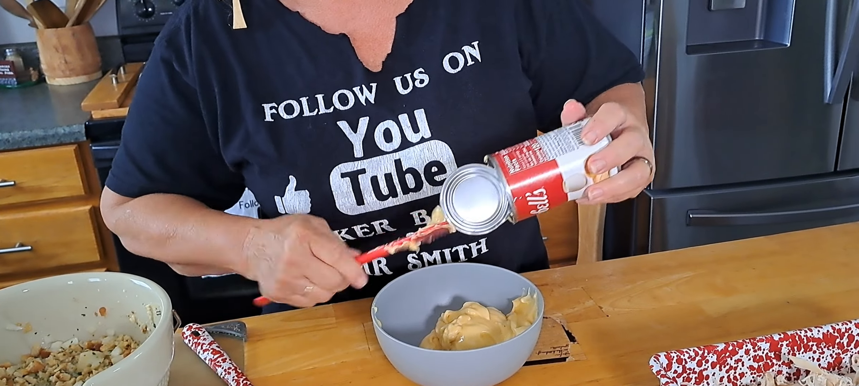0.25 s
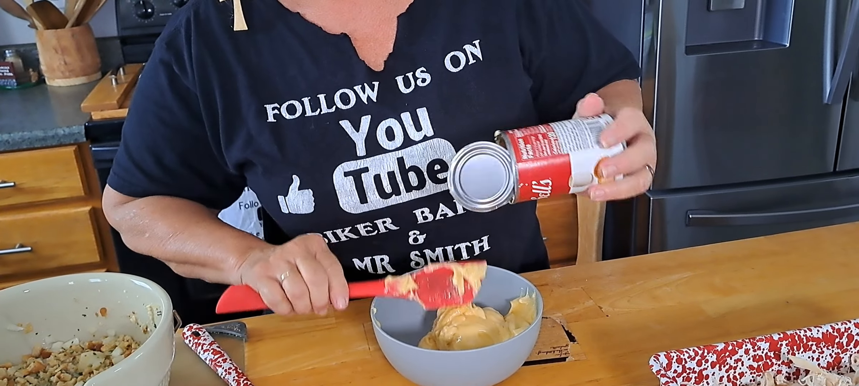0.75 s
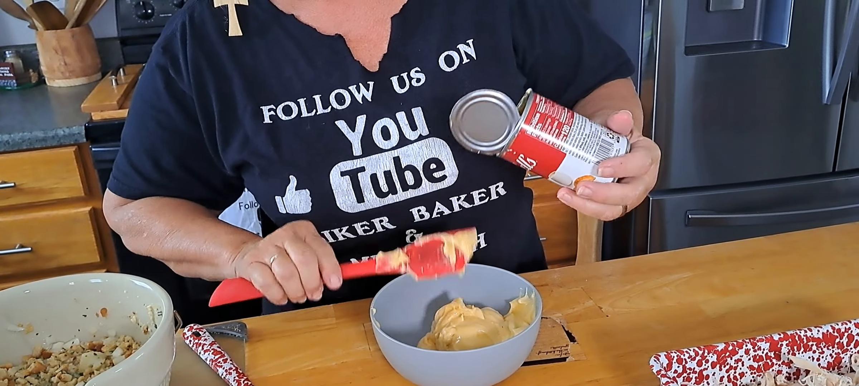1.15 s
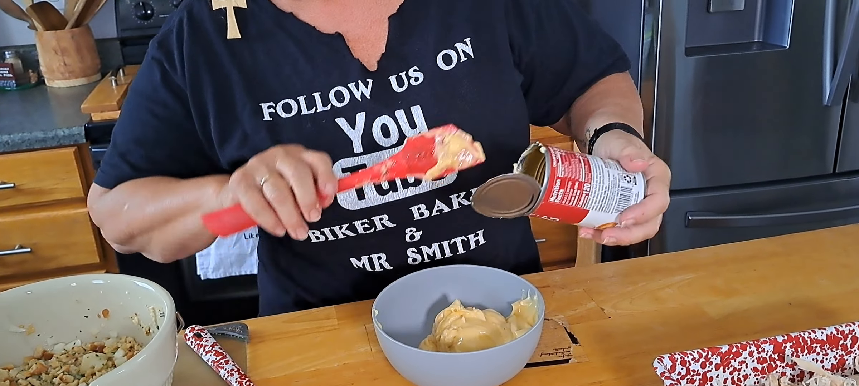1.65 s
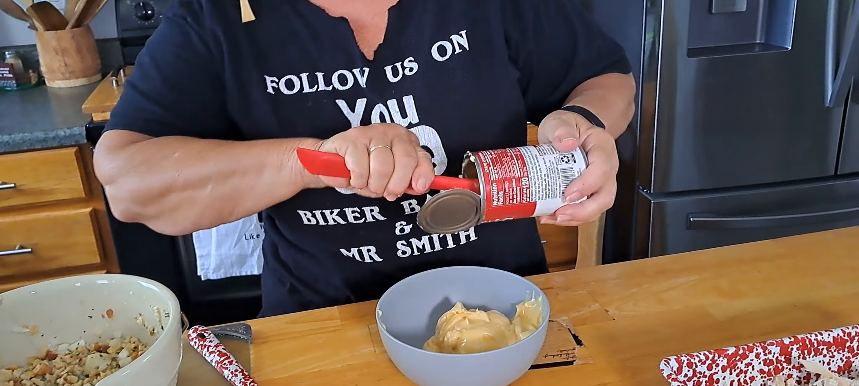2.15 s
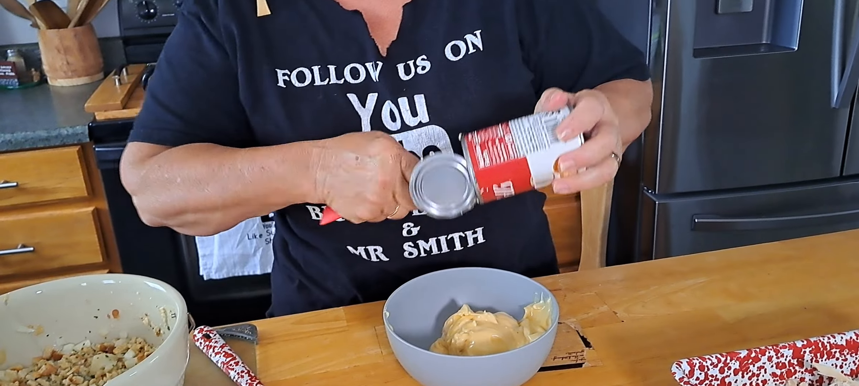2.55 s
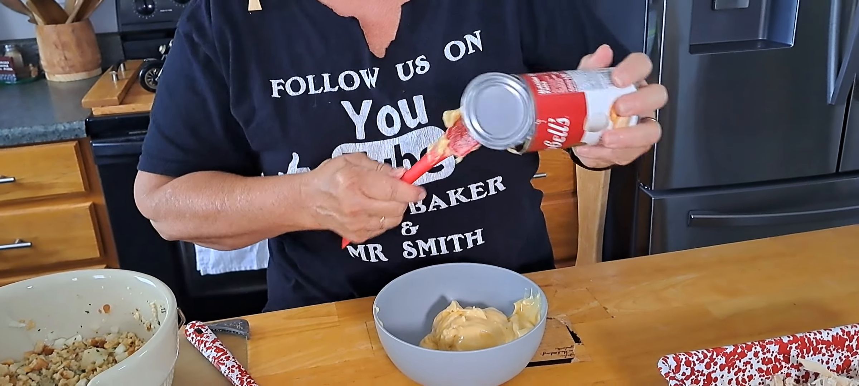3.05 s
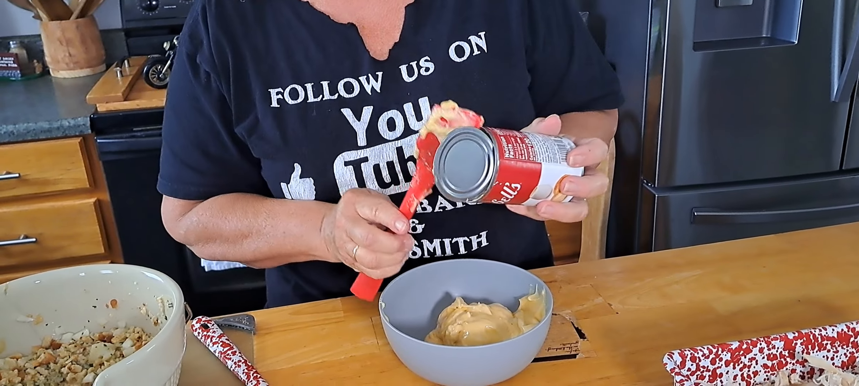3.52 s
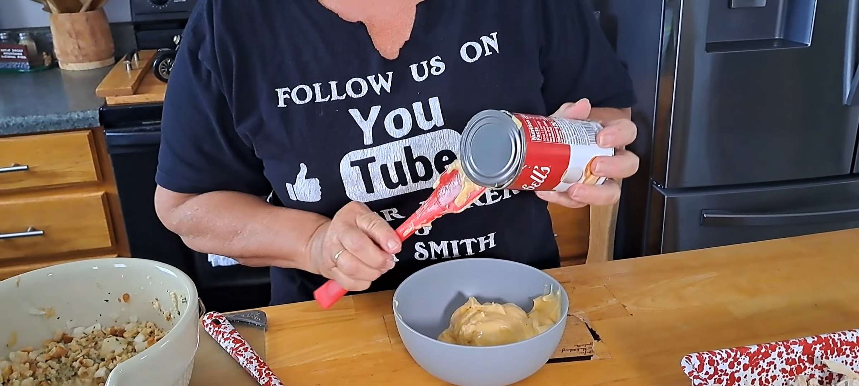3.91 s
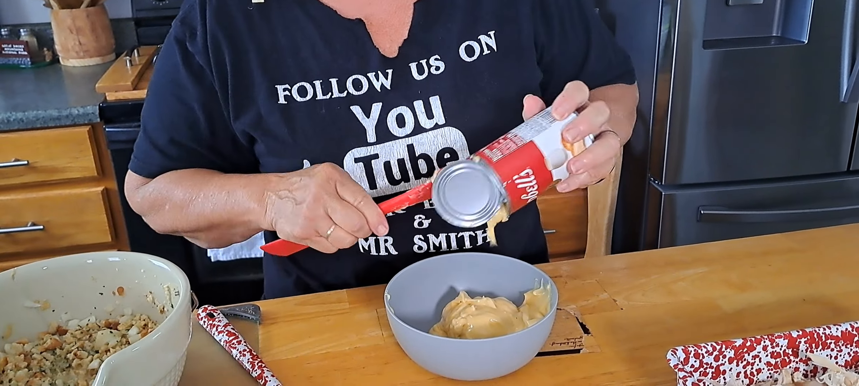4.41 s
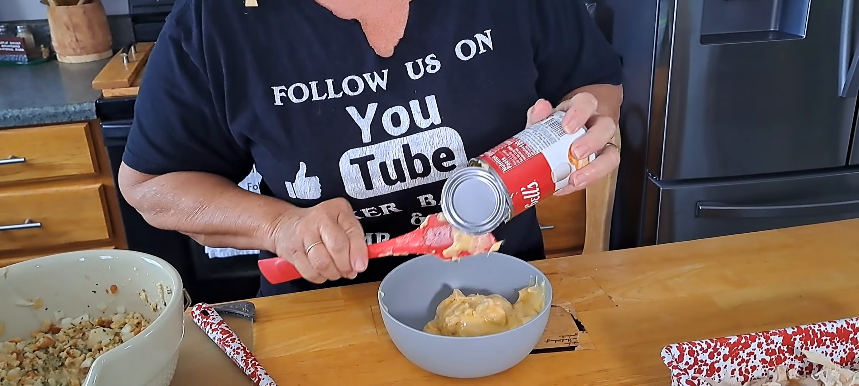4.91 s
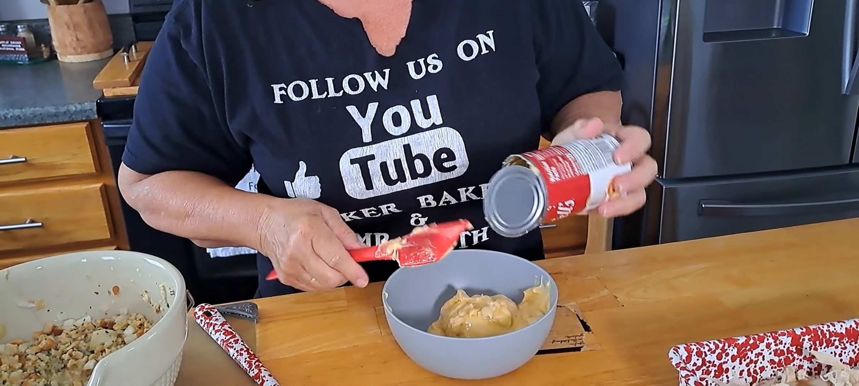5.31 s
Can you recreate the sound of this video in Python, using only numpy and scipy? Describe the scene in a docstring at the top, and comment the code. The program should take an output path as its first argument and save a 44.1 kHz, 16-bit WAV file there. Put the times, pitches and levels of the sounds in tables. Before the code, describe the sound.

In a quiet kitchen, a spatula raps a bowl four times with woody thuds, then a can is scraped with soft thumps and brief squeaks.

```python
"""A spatula is knocked four times on a bowl rim: each knock is a noise crack plus short ringing modes.
The bowl rocks on a wooden counter; every landing excites the counter's low modes.
The spatula goes back into a tin can of thick soup: noise slips through the can's resonances scrape,
unsteady sines squeal, shaped noise rubs. Close on the left, dull modal bumps rebound.
A quiet kitchen adds noise-tail reverberation, low rumble and hum that rise and fall, and faint hiss."""
import sys
import numpy as np
from scipy import signal
from scipy.fft import rfft, irfft
from scipy.io import wavfile
from scipy.ndimage import uniform_filter1d

SR = 44100
rng = np.random.default_rng(int(sys.argv[2]) if len(sys.argv) > 2 else 0)


def int16_out(signal):
    """Quantize to a 16-bit WAV file."""
    q = np.round(np.clip(np.atleast_2d(signal).T, -1, 1) * 32767)
    wavfile.write(sys.argv[1], SR, q.astype(np.int16))


N = 245548

# spatula on bowl rim [t/s, level/dB, treble tilt/(dB/octave), room/dB, delay to bowl landing/s, landing/dB]
KNOCKS = [(0.5346, -2.5, -0.5, 7, .0622, 2.5), (0.7693, 1, -2, 1, 0.038, -0.5), (1.0151, 1, -1, 2, .05, -2),
          (1.3124, -7, -1.5, 3.5, 0.032, -8)]
# knock crack spectrum [f/Hz, level/dB]
CRACK = [(80, -9.5), (170, 0.5), (450, -28.5), (850, -4.5), (1080, 0.5), (1280, -3.5), (1900, -4),
         (2500, -13), (3750, 1.5), (4250, -5.5), (5500, -7.5), (7700, -17.5), (9000, -30), (15000, -44)]
# bowl modes [f/Hz, level/dB, t60/s]
BOWL_MODES = [(290, -4.5, 0.077), (564, -16, 0.08), (767, -17, 0.21), (1017, 0, 0.031), (1060, -1, 0.027),
              (1330.4, -2, .045), (1560, -0.5, .05), (1755, -13, 0.078), (2059, -14, .035),
              (3570, -4, 0.017), (5536, -4.5, 0.027)]
# wooden counter modes [f/Hz, level/dB, t60/s]
COUNTER_MODES = [(47.62, -27, 0.7), (72.5, -28.5, 0.46), (103.8, -19, 0.28), (168.1, -8, 0.25),
                 (201.6, -9, .2), (222.9, 3.5, 0.053), (302.4, -14, 0.22), (423, -9.5, .07),
                 (614, -12.5, .06)]
# the bowl lands, then rocks to rest in even, weakening steps; push is relative to the knock
PUSH_DB, ROCK_S, ROCK_LOSS_DB = -3, .0305, 11

# blade friction spectrum on tin [f/Hz, level/dB]
FRICTION = [(150, -26.5), (500, -13), (900, -7), (1600, -8.5), (2500, -5.5), (4000, -5), (5200, -7.5),
            (8000, -14), (9500, -29), (15000, -31.5)]
# can resonances [f/Hz, width/Hz, level/dB]
CAN_RESONANCES = [(667.6, 250, 9.1), (970, 62, 1.2), (2341, 250, 7), (3330, 51, 5.3), (3840, 87, 6.1)]
# blade catching rim or lid [t/s, level/dB, treble tilt/(dB/octave)]
TICKS = [(0.636, -25.5, 3), (2.023, -46, -7), (2.141, -60.5, 8), (2.444, -49, 24), (2.557, -37.5, -1),
         (2.817, -48, -7.5), (3.043, -48.5, 3), (3.6565, -20.5, 0), (3.77, -39.5, 8), (3.783, -38.5, 5),
         (3.829, -42.5, 5), (3.932, -50, 9.5), (4.172, -28.5, 3), (4.31, -54.5, 2.5), (4.487, -59, -5.5)]
TICK_RISE_S, TICK_FALL_S = 0.00058, 0.0029
# blade dragging over tin
# [peak t/s, rise/s, fall/s, rasp level/dB, low note f/Hz, level/dB, high note f/Hz, level/dB]
DRAGS = [(1.951, 0.0069, 0.033, -59, 1039, -55.5, 2300, -58.5),
         (2.923, 0.037, 0.0099, -28, 784, -43, 2507, -36.5),
         (3.675, .009, 0.037, -36, 675.7, -28.5, 2340, -42)]
NOTE_UNSTEADY = 0.055  # rms pitch wobble, share of pitch
# thin whistles while the can is wiped [peak t/s, level/dB, f/Hz]
WHISTLES = [(2.33, -80, 4800), (3.06, -69.5, 2734), (3.35, -78.5, 2780)]
WHISTLE_RISE_S, WHISTLE_FALL_S, WHISTLE_UNSTEADY = 0.065, 0.21, 0.029
# level of the blade sweeping through soup [t/s, level/dB]
SWEEP = [(0, -79.5), (1.8, -84.5), (2.0, -64), (2.45, -62), (3.1, -63), (3.35, -57.5), (3.6, -64.5),
         (4.55, -67), (4.7, -75)]
# hollow spectrum of that sweep [f/Hz, level/dB]
HOLLOW = [(150, -22), (300, -5.5), (450, 0.5), (640, 2.5), (800, -12), (1100, -25.5), (2000, -26),
          (5000, -26.5), (15000, -50.5)]

# dull bumps on the left [t/s, level/dB, treble tilt/(dB/octave)]
BUMPS = [(2.815, -20.5, 10.5), (2.9093, 2, 10.5), (2.968, -11.5, 5), (3.0435, -1.5, 8), (3.358, -25.5, 5.5),
         (3.728, -8, 13.5), (3.753, -5.5, 9), (3.829, -12.5, 13), (3.925, -22.5, 7), (3.955, -22.5, 0),
         (3.999, -21.5, -2.5), (4.035, -21.5, -1.5), (4.117, -26, 1), (4.1712, 1.5, 7), (4.291, -16.5, 6),
         (4.3098, -7.5, 6), (4.416, -16.5, 0), (5.457, -23, -2.5)]
# nominal bump modes, before pitch scatter and damping [f/Hz, level/dB, t60/s]
BUMP_MODES = [(209, -6, 0.08), (299.5, 9.5, 0.024), (418, 7, 0.017), (628, -7.5, 0.025), (1052, -4, 0.01),
              (1295, -15.5, 0.026), (1540, -21, 0.015)]
# low boom after the firmest bump [f/Hz, level/dB, t60/s]
BOOM = [(204, -18, 0.21)]
# each rebound is weaker and duller; firmer bumps die sooner
REBOUND_S, REBOUND_LOSS_DB, REBOUND_DULLING_DB_PER_OCTAVE, DAMPING_PER_DB = 0.016, 10.5, 2, .012

# room decay [f/Hz, t60/s]
ROOM_T60 = [(100, 0.26), (400, .38), (3200, 0.33), (5500, 0.41), (8000, .33), (14000, 0.24)]
# room spectrum [f/Hz, level/dB]
ROOM_COLOUR = [(100, -13), (250, -4), (550, 8), (1100, -2), (2500, 0), (5500, -10), (8000, -4.5),
               (14000, 3)]
# room left-right likeness [f/Hz, likeness]
ROOM_SAME = [(100, 0.919), (300, 0.79), (600, 0.41), (1200, .1), (3000, 0.048)]

# rumble, hum and hiss spectrum [f/Hz, level/dB]
BACKGROUND = [(15, -41.5), (25, -10.5), (59, 1.5), (86, -5.5), (178, -5), (204, -10.5), (233, -3.5),
              (349, -18.5), (421, -5.5), (457, -19.5), (648, -19), (762, -34), (3530, -43.5), (7300, -37),
              (15500, -49)]
BACKGROUND_DB = -60  # rms before LOW_LEVEL
# background left-right likeness [f/Hz, likeness]
BACKGROUND_SAME = [(100, 0.89), (300, .8), (700, .6), (2000, 0.016), (12000, 0.01)]
# low rumble and hum, rising and falling; near 5.25 s a soft handling rumble, spatula on bowl or hand
# [t/s, level/dB]
LOW_LEVEL = [(0, -2.5), (1.7, -2.5), (2.5, -2.5), (4.5, 0.5), (5.0, -3), (5.25, 0.5), (5.57, -1)]

EDGE_HZ = 15900  # upper band limit


def knocks(crack_db=6, ring_db=-21, chatter_db=-16, chatter_s=0.004, room_db=-3, left_db=-2.0):
    """A blow is a sharp push, milliseconds of decaying chatter, and a short bowl ring damped by the soup."""
    out = np.zeros((2, N))
    t = np.arange(SR // 2) / SR
    contact = gain_of(chatter_db) * pair(ROOM_SAME, len(t)) * np.exp(-t / chatter_s)
    contact[:, 0] -= 1  # push common to both channels
    for s, db, tilt_db, wet_db, *_ in KNOCKS:
        crack = gain_of(crack_db) * convolve(contact, colour(CRACK, tilt_db))
        blow = crack + gain_of(ring_db) * ring(BOWL_MODES, tilt_db)
        add(out, s, gain_of(db) * (blow + gain_of(room_db + wet_db) * kitchen(blow)))
    return out * gain_of([[left_db], [0]])


def thuds(thud_db=-14, soft_s=0.0013, room_db=-7, count=3):
    """The bowl's foot softly excites counter modes at the blow, then at each landing as it rocks."""
    out = np.zeros(N)
    t = np.arange(SR // 2) / SR
    boom = ring(COUNTER_MODES) * (1 - np.exp(-t / soft_s))
    for s, db, _, _, tipped_s, landing_db in KNOCKS:
        add(out, s, gain_of(db + PUSH_DB) * boom)
        for k in range(count):
            add(out, s + tipped_s + k * ROCK_S, gain_of(landing_db - k * ROCK_LOSS_DB) * boom)
    return gain_of(thud_db) * (out + gain_of(room_db) * kitchen(out))


def can(direct_db=-4, room_db=-3, squeal_room_db=-8, left_db=-2):
    """Scrapes and squeals, direct and reverberant, over the hollow rub of the blade in soup."""
    rasp, notes = scrapes(), squeals()
    reflected = kitchen(gain_of(room_db) * rasp + gain_of(squeal_room_db) * notes)
    heard = gain_of(direct_db) * rasp + notes + reflected
    rub = level(SWEEP) * evened(convolve(pair(BACKGROUND_SAME, N), colour(HOLLOW)))
    return heard * gain_of([[left_db], [0]]) + rub


def scrapes(grain_db=3, drag_tilt_db=0.0):
    """Dense uneven slips of the blade, swelling and dying, excite the tin's resonances."""
    out = np.zeros(N)
    t = np.arange(-SR // 8, SR // 4) / SR
    strokes = [(s, TICK_RISE_S, TICK_FALL_S, db, tilt_db) for s, db, tilt_db in TICKS]
    strokes += [(s, rise, fall, db, drag_tilt_db) for s, rise, fall, db, *_ in DRAGS]
    for s, rise, fall, db, tilt_db in strokes:
        grain = gain_of(grain_db * np.minimum(rng.exponential(1, len(t)), 4))
        slips = evened(rng.standard_normal(len(t)) * grain)
        rasp = convolve(slips * stroke(t, rise, fall), colour(FRICTION, tilt_db, CAN_RESONANCES))[0]
        add(out, s + t[0], gain_of(db) * rasp)
    return out


def squeals(lead=.55, swell=1.01):
    """Uneven grip shakes the pitch of short sines; drag notes peak ahead of the rasp by a share of its rise."""
    out = np.zeros(N)
    t = np.arange(-SR // 4, SR * 3 // 4) / SR
    notes = [(s, db, WHISTLE_RISE_S, WHISTLE_FALL_S, hz, WHISTLE_UNSTEADY) for s, db, hz in WHISTLES]
    for s, rise, fall, _, low_hz, low_db, high_hz, high_db in DRAGS:
        for hz, db in [(low_hz, low_db), (high_hz, high_db)]:
            notes.append((s - lead * rise, db, swell * rise, fall, hz, NOTE_UNSTEADY))
    for s, db, rise, fall, hz, unsteady in notes:
        shake = evened(uniform_filter1d(rng.standard_normal(len(t)), size=50))
        cycles = np.cumsum(hz * (1 + unsteady * shake)) / SR
        add(out, s + t[0], gain_of(db) * stroke(t, rise, fall) * np.sin(2 * np.pi * cycles))
    return out


def stroke(t, rise, fall):
    """Pressure builds smoothly up to t = 0, then dies exponentially."""
    return np.exp(np.where(t < 0, -(t / rise) ** 2, -t / fall))


def bumps(bump_db=-11, low_hz=150, dull_hz=1600, echo_s=0.00491, echo_db=-9, right_db=-16, count=3):
    """Soft contacts rebound, each with one early echo; the right gets a faint smeared copy."""
    out = np.zeros(N)
    for s, db, tilt_db in BUMPS:
        for k in range(count):
            at = s + k * REBOUND_S
            contact = bump(db - k * REBOUND_LOSS_DB, tilt_db - k * REBOUND_DULLING_DB_PER_OCTAVE)
            sound = gain_of(bump_db) * contact
            add(out, at, sound)
            add(out, at + echo_s * rng.uniform(.8, 1.2), gain_of(echo_db) * sound)
    firmest = max(BUMPS, key=lambda row: row[1])
    add(out, firmest[0] + echo_s, ring(BOOM))
    out = signal.sosfilt(signal.butter(8, dull_hz, fs=SR, output="sos"), out)
    out = signal.sosfilt(signal.butter(2, low_hz, "high", fs=SR, output="sos"), out)
    smear = rng.standard_normal(SR // 50) * np.exp(-np.linspace(0, 4, SR // 50))
    right = gain_of(right_db) * convolve(out, smear / np.linalg.norm(smear))[0]
    return np.array([out, right])


def bump(db, tilt_db, soft_s=0.00078, scatter=0.085):
    """One soft contact excites damped modes, their pitches scattered each time."""
    t = np.arange(SR // 2) / SR
    modes = [(hz * (1 + scatter * rng.uniform(-1, 1)), mode_db, t60) for hz, mode_db, t60 in BUMP_MODES]
    contact_s = soft_s * gain_of(-db / 2)  # lighter touch presses in more slowly
    ringing = ring(modes, tilt_db, np.exp(-DAMPING_PER_DB * db))
    return gain_of(db) * ringing * (1 - np.exp(-t / contact_s))


def kitchen(x, gap_s=0.002, build_s=0.0067):
    """Reflections thicken over the first milliseconds, then each band dies at its own speed."""
    hz, t, z = signal.stft(pair(ROOM_SAME, SR * 3 // 4), SR, nperseg=256)
    decay = np.exp(-np.log(1000) * t / read(ROOM_T60, hz)[:, None])
    tail = signal.istft(z * gain_of(read(ROOM_COLOUR, hz))[:, None] * decay, SR)[1]
    since_gap_s = np.maximum(np.arange(tail.shape[1]) / SR - gap_s, 0)
    tail = tail * (1 - np.exp(-since_gap_s / build_s))
    return convolve(x, tail / np.linalg.norm(tail[0]))


def background(split_hz=700, hiss_db=0):
    """Shaped noise: low rumble and hum, rising and falling, under a faint even hiss."""
    noise = convolve(pair(BACKGROUND_SAME, N + SR), colour(BACKGROUND))[:, SR:]  # drop filter start-up
    air = gain_of(BACKGROUND_DB) * evened(noise)
    low = signal.sosfiltfilt(signal.butter(2, split_hz, fs=SR, output="sos"), air)
    return low * level(LOW_LEVEL) + gain_of(hiss_db) * (air - low)


def gain_of(db):
    """Decibels to amplitude factor."""
    return 10 ** (np.asarray(db) / 20)


def evened(x):
    """Scales to an rms of 1."""
    return x / np.sqrt(np.mean(x ** 2) + 1e-20)


def read(points, hz):
    """Interpolates a spectrum table over log frequency."""
    f, value = np.transpose(points)
    return np.interp(np.log(hz + 1), np.log(f + 1), value)


def level(curve):
    """A curve in dB as a gain for every sample."""
    return gain_of(np.interp(np.arange(N) / SR, *np.transpose(curve)))


def add(mix, s, sound):
    """Mixes a sound in at time s, in seconds."""
    part = mix[..., max(round(s * SR), 0):][..., :sound.shape[-1]]
    part += sound[..., :part.shape[-1]]


def convolve(x, response):
    """Convolves along time and keeps the length of x."""
    return signal.fftconvolve(np.atleast_2d(x), np.atleast_2d(response), axes=1)[:, :x.shape[-1]]


def colour(spectrum, tilt_db=0, peaks=(), size=4096):
    """Causal minimum-phase response of unit energy: a tilted spectrum with resonances on top."""
    hz = np.abs(np.fft.fftfreq(size, 1 / SR))
    gain = gain_of(read(spectrum, hz) + tilt_db * np.log2(np.maximum(hz, 500) / SR))
    resonance = sum(gain_of(db) ** 2 / (1 + (2 * (hz - f) / width) ** 2) for f, width, db in peaks)
    gain = gain * np.sqrt(1 + resonance)
    response = np.fft.ifft(np.exp(np.conj(signal.hilbert(np.log(gain))))).real[:size // 2]
    return response / np.linalg.norm(response)


def ring(modes, tilt_db=0, stretch=1):
    """Modes are dying sines; tilt pivots on their median frequency, stretch scales t60."""
    t = np.arange(SR // 2) / SR
    centre_hz = np.median([m[0] for m in modes])
    out = np.zeros(len(t))
    for hz, db, t60 in modes:
        decay = np.exp(-np.log(1000) * t / (t60 * stretch))
        out += gain_of(db + tilt_db * np.log2(hz / centre_hz)) * np.sin(2 * np.pi * hz * t) * decay
    return out


def pair(likeness, count):
    """Two white noises, alike by the given amount at each frequency."""
    a, b = rfft(rng.standard_normal((2, count)))
    same = np.clip(read(likeness, np.fft.rfftfreq(count, 1 / SR)), -1, 1)
    return irfft(np.array([a, same * a + np.sqrt(1 - same ** 2) * b]), count)


def scene():
    """Bowl, counter, can, bumps and kitchen background together."""
    return knocks() + thuds() + can() + bumps() + background()


def record(dry, low_cut_hz=42):
    """The low cut of the microphones, then the upper band limit."""
    heard = signal.sosfilt(signal.butter(4, low_cut_hz, "high", fs=SR, output="sos"), dry)
    band_limit = signal.firwin(511, EDGE_HZ, window=("kaiser", 9), fs=SR)
    return signal.oaconvolve(heard, band_limit[None], "same")


dry = scene()
out = record(dry)
int16_out(out)
```